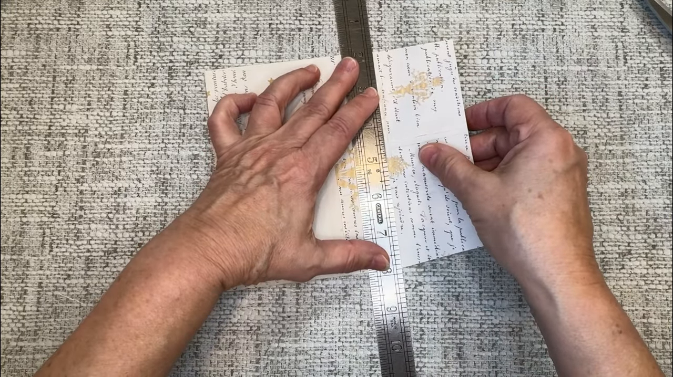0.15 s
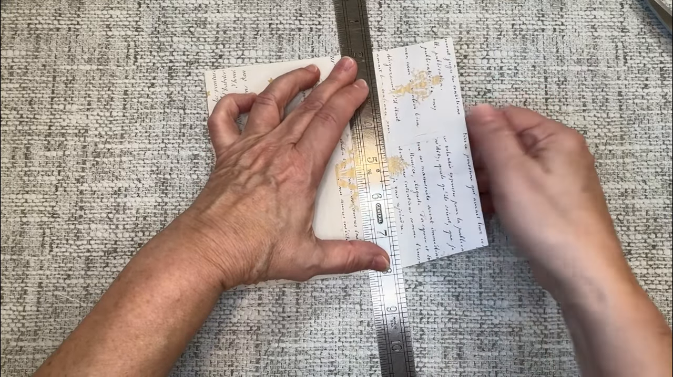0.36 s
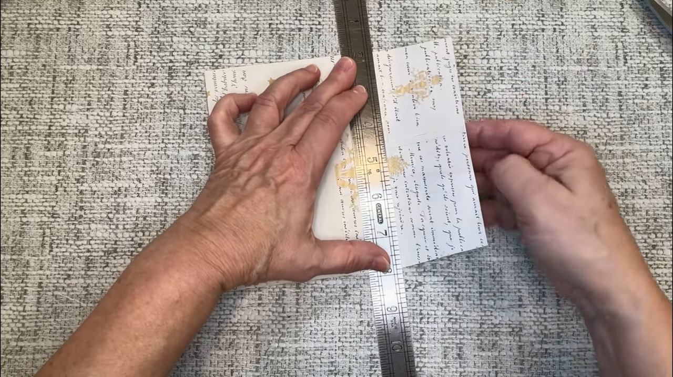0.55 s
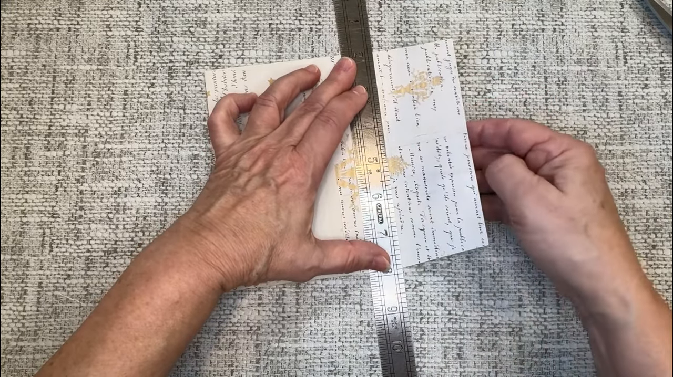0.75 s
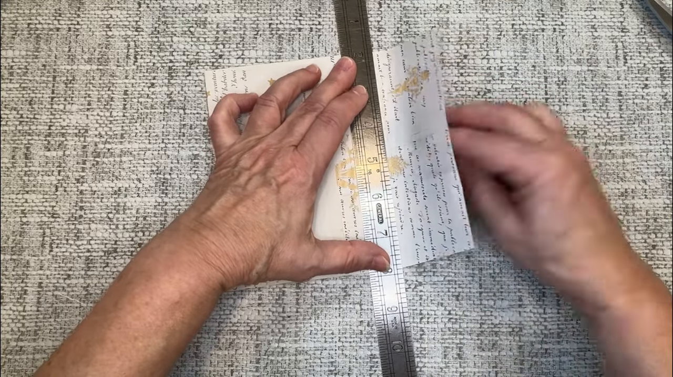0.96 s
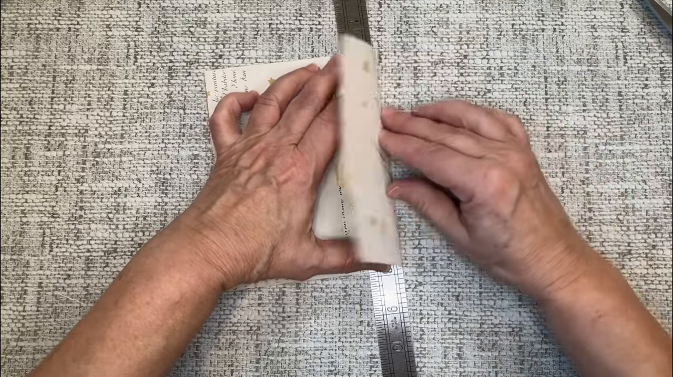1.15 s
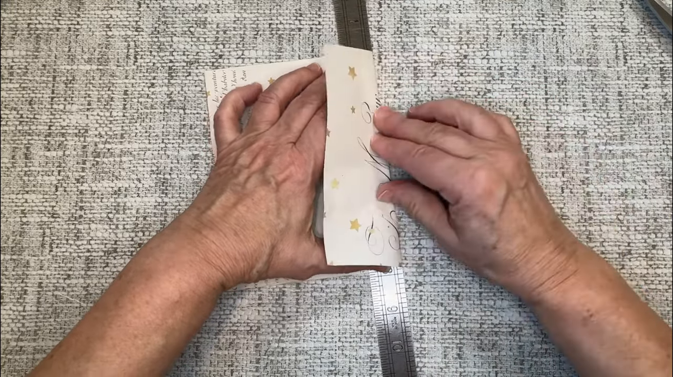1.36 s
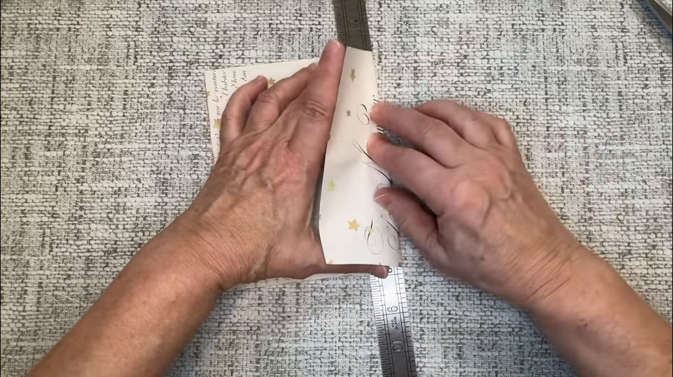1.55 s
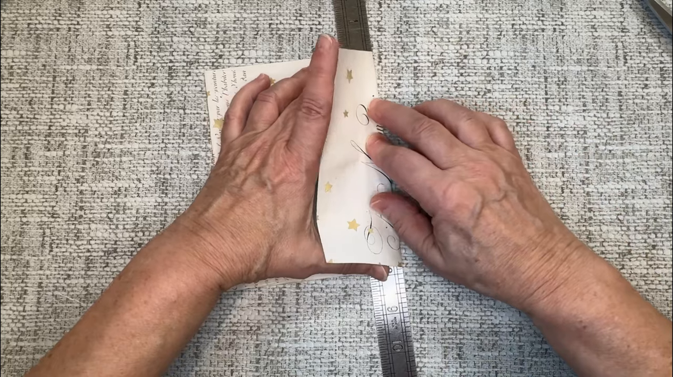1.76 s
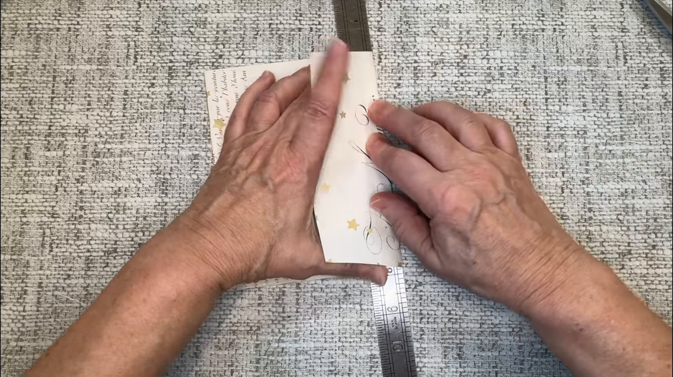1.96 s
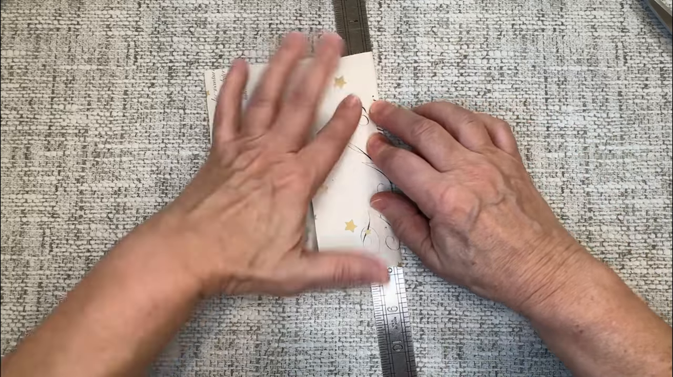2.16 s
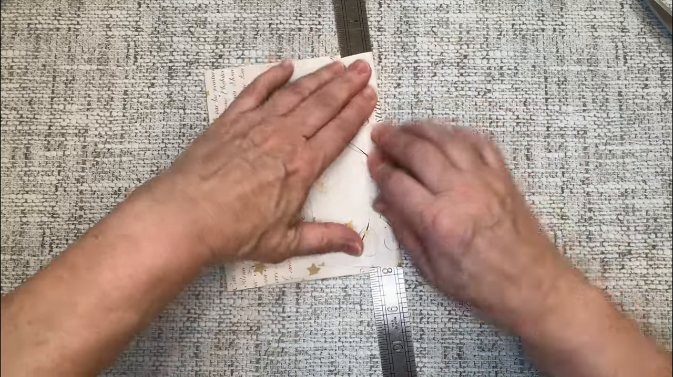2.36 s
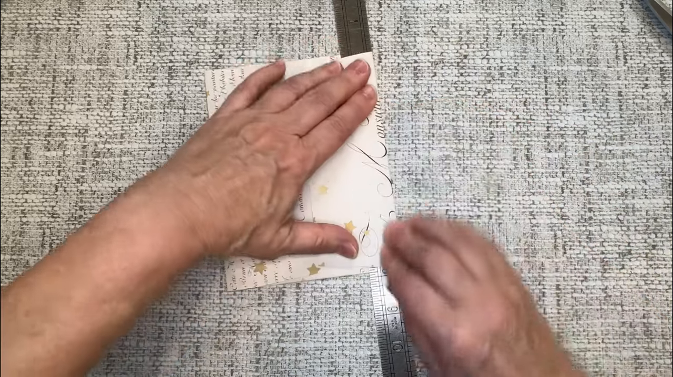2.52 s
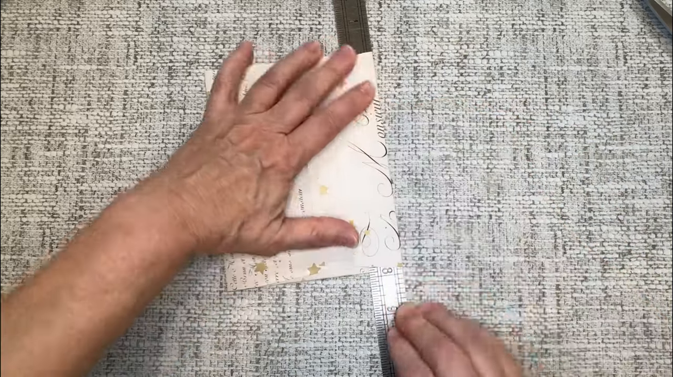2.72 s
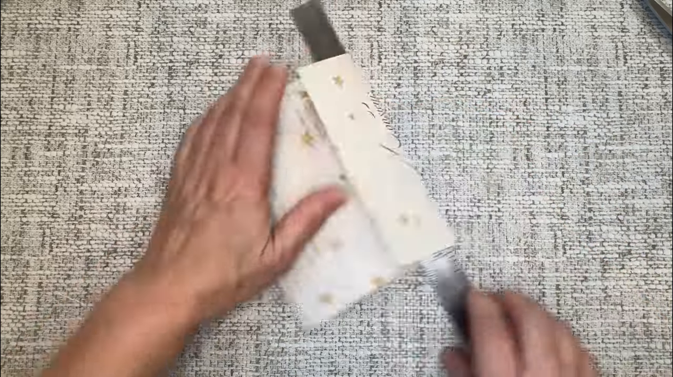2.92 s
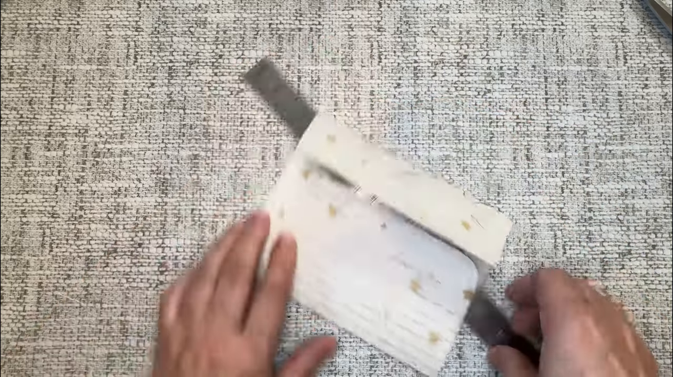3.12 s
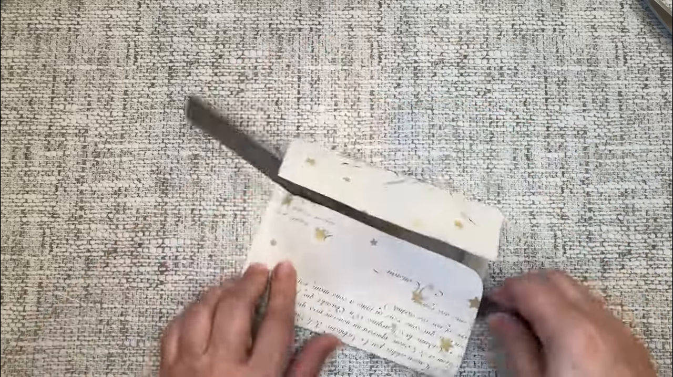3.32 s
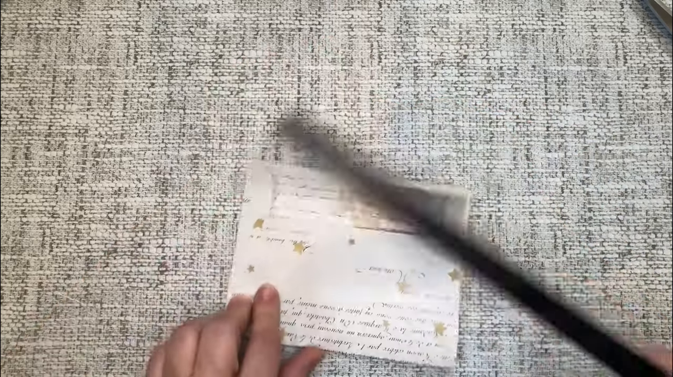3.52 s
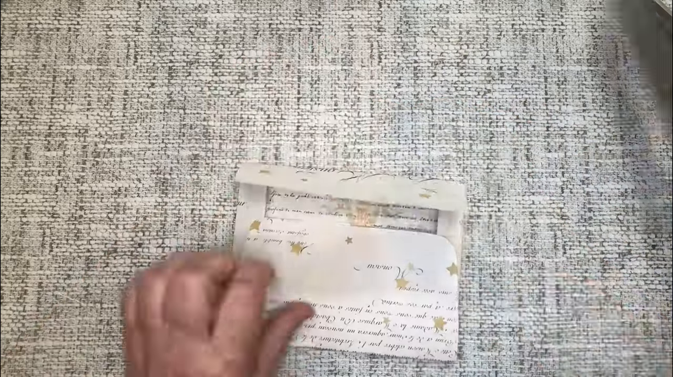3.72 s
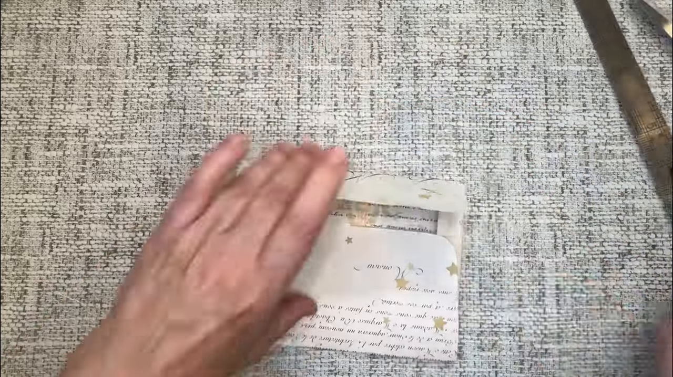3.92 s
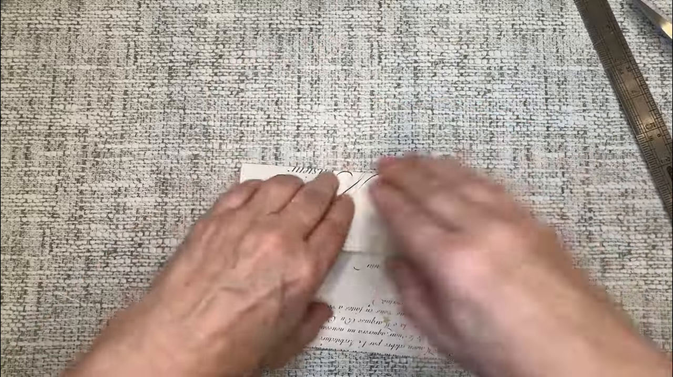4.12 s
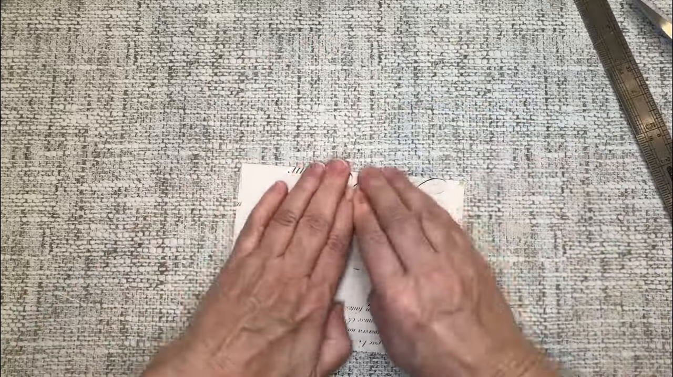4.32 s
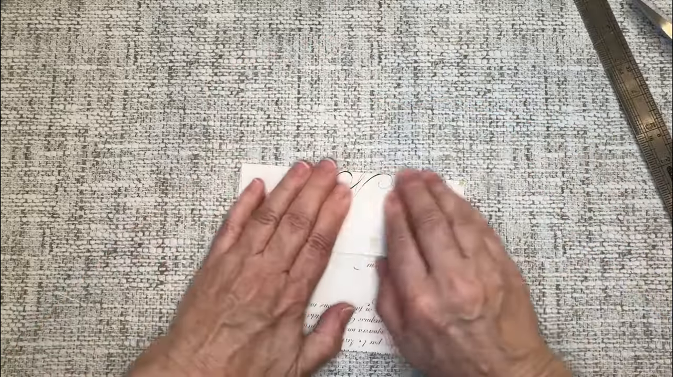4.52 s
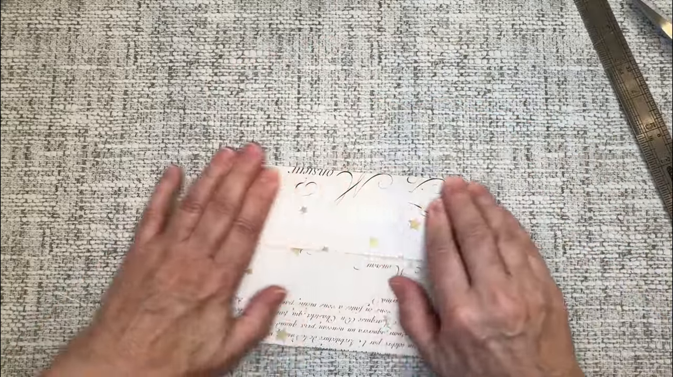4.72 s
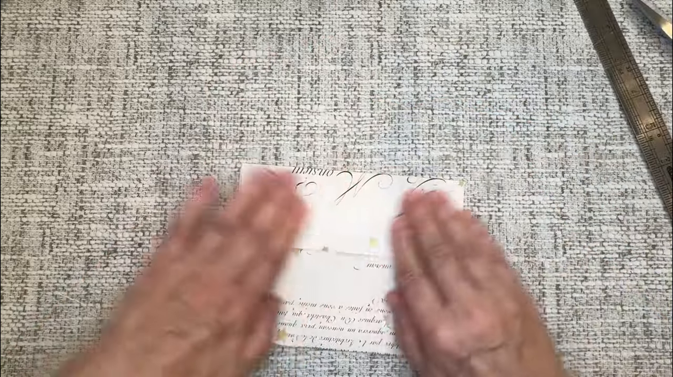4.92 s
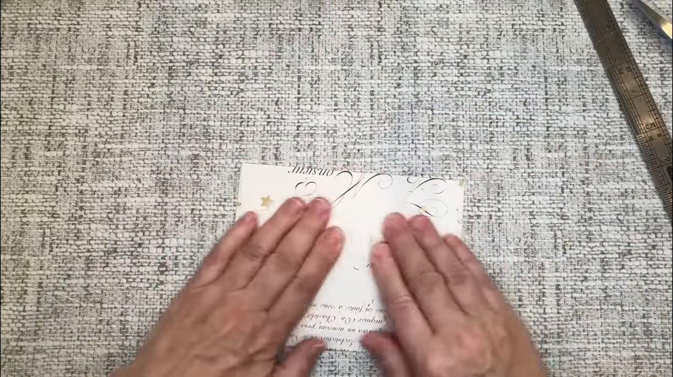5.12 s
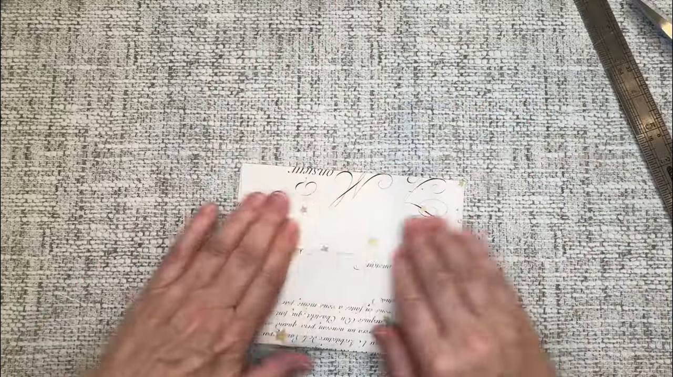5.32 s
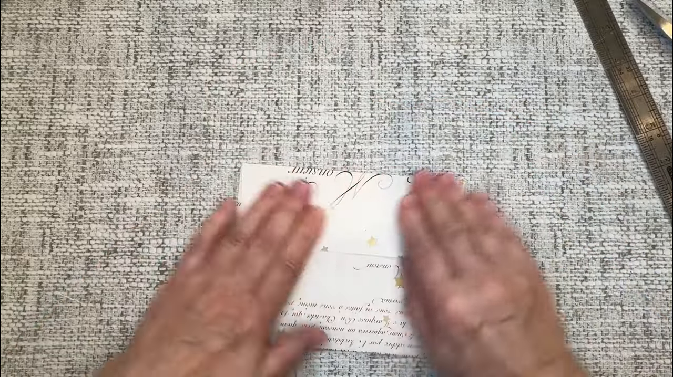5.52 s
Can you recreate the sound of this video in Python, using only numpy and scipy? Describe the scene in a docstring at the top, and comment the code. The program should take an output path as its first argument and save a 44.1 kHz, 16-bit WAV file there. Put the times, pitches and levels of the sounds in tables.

```python
"""At a table in a quiet room, hands fold a small sheet of paper over a steel ruler on a mat, lay the
ruler aside and rub the crease flat. Skin hisses over the fibres, edges scrape, and the sheet's
resonant panels rustle and snap as they buckle. The ruler clatters and rings; the table thuds under
the hands. Faint air and mains hum lie underneath, and the stereo image is that of two microphone ports."""
import sys
import numpy as np
from scipy import signal
from scipy.fft import rfft, irfft, next_fast_len
from scipy.io import wavfile
from scipy.ndimage import uniform_filter1d

SR = 44100
rng = np.random.default_rng(int(sys.argv[2]) if len(sys.argv) > 2 else 0)


def file_out(sig):
    """Save sig as 16-bit WAV at sys.argv[1]."""
    # one column per channel
    cols = np.atleast_2d(sig).T
    # limit, then scale
    lim = np.clip(cols, -1, 1)
    pcm = np.round(lim * 32767).astype(np.int16)
    wavfile.write(sys.argv[1], SR, pcm)


N = 250207
T, FFT_SIZE = np.arange(N) / SR, next_fast_len(N + SR // 2)
HZ = np.maximum(np.arange(FFT_SIZE // 2 + 1) * SR / FFT_SIZE, 1)

# Cue levels are relative, ahead of each layer's trim; decays are nominal, scaled per layer.
# Skin on paper, paper on mat: t/s, rise/s, hold/s, hiss/dB, scrape/dB, rustle/dB, tilt/(dB/octave)
STROKES = [(0.167, 0.035, 0.048, -52, -56, -52, 4.5), (0.261, 0.14, 0.041, -50, -53.5, -59, 5),
           (0.474, 0.047, 0.051, -55.5, -63, -61.5, 14), (0.599, .02, 0.069, -72, -88, -71, 6.5),
           (0.777, 0.061, 0.021, -52, -59, -59, 13.5), (0.877, 0.095, 0.024, -39.5, -44, -46, 9),
           (1.003, 0.022, 0.04, -42, -47.5, -47, -3.5), (1.11, 0.058, 0.022, -51.5, -53, -49, -0.5),
           (1.3, 0.11, 0.067, -40, -45.5, -41, -3), (1.529, 0.042, 0.053, -52, -57, -45.5, -1),
           (1.642, 0.062, 0.054, -47, -53.5, -41.5, -4.5), (1.779, 0.029, 0.0099, -49, -44.5, -50, -2),
           (1.926, 0.035, 0.12, -44, -52.5, -52, 2.5), (2.204, 0.026, 0.0094, -40, -52.5, -48, -5),
           (2.263, 0.1, 0.12, -44.5, -62, -55.5, -6), (2.488, 0.02, 0.34, -48, -61, -58.5, -4.5),
           (2.77, 0.06, 0.16, -44, -46.5, -47.5, -5), (2.992, 0.051, 0.1, -38.5, -39.5, -46, 5),
           (3.192, 0.061, 0.061, -44.5, -44.5, -43.5, -1), (3.321, 0.044, 0.13, -47, -46.5, -47, -3.5),
           (3.424, 0.036, 0.019, -50, -43.5, -43, -2), (3.581, 0.037, 0.0075, -58.5, -59.5, -63, -10),
           (3.653, 0.012, 0.025, -52, -55, -52.5, -3.5), (4.08, 0.044, 0.13, -51, -50.5, -53.5, -7.5),
           (4.282, 0.026, 0.065, -58.5, -60.5, -56, -5), (4.348, 0.21, 0.19, -44, -53.5, -62, 0.5),
           (4.846, 0.04, 0.059, -40.5, -53.5, -65, 12), (4.896, 0.06, 0.017, -36, -45, -49.5, 0),
           (4.99, 0.13, 0.097, -45.5, -53.5, -60.5, 3), (5.259, 0.12, 0.029, -41.5, -52, -61.5, 6),
           (5.404, 0.066, 0.16, -42.5, -51, -50, -6)]
# The sheet buckles or is tapped: t/s, level/dB, treble offset/dB, bass offset/dB, decay/s,
# left minus right/dB, tilt/(dB/octave)
SNAPS = [(0.191, -47.5, -7, -34, 0.0097, -14, -3), (0.774, -65.5, -38, 14, 0.023, 5, -10),
         (0.987, -36, -14, -32, 0.039, -9, -2.5), (1.042, -46.5, -11, -3, 0.12, -2, 10),
         (1.183, -55.5, -20, 5, 0.097, 3, -15.5), (1.214, -18, -4.5, -12.5, 0.013, 1.5, 7.5),
         (1.343, -26.5, -21.5, -11.5, 0.024, 3.5, -5), (1.394, -32, -5.5, -19, 0.025, -7, -6),
         (1.4454, -17.5, -10, -10.5, 0.018, -1, 2.5), (1.8167, -38, 7.5, -36, 0.088, -5, -6),
         (1.824, -26, -1, -16, 0.023, -4, -1), (1.8306, -27, -28, -42, 0.019, 0, -1.5),
         (2.0318, -42.5, 4, -41, 0.11, -0.5, 0.5), (2.076, -31.5, 0, -10.5, 0.068, 0.5, -2),
         (2.2241, -42, -1, -5, 0.056, 3.5, 1.5), (2.432, -54, -17, -5, 0.011, 11, -5),
         (2.6964, -45, -4.5, -9, 0.037, 1, -9.5), (3.0402, -34, -14, -7, 0.03, 0, 3.5),
         (3.2, -36.5, -5.5, -42, 0.022, -2, -0.5), (3.233, -48, -12, -18, 0.012, -6, -5),
         (3.492, -33, -33, -8, 0.056, -4, -1.5), (3.522, -40.5, -27, 0, 0.04, -4, -8),
         (4.183, -43, 0, 3, 0.028, 10, -12.5), (4.189, -32.5, 1.5, -12, 0.016, -1.5, 5.5),
         (4.436, -51.5, -22, -17, 0.012, -8, -7.5), (5.3312, -42, 16, -29, 0.024, 5, 1.5),
         (5.379, -34, -3, -10, 0.0099, 5, -3), (5.516, -38.5, -2, -6, 0.0084, 7.5, -6.5)]
# Panel resonances: f/Hz, width/Hz, level bent over the ruler/dB, level loose/dB
PANEL_MODES = [(548, 540, -10.5, -7), (1345, 530, 5, 2), (1744, 385, 0.5, 6), (2070, 310, -11, 6),
               (2500, 846, 7.5, 5), (3240, 880, -11, -1), (4340, 1230, -5, -3.5)]
# Tone of skin on paper: f/Hz, level/dB
SKIN_EQ = [(5000, -31.5), (7500, -3.5), (9500, -3.5), (12000, 3), (13700, -3.5), (15200, -6), (16500, 0.5)]
# Tone of a scraping edge: f/Hz, level/dB
EDGE_EQ = [(2500, -8.5), (3500, 1), (4600, 6.5), (5400, 5), (6200, 7), (7200, -4), (9000, -27.5)]
# The ruler hits the table: t/s, level/dB, tick offset/dB, thud offset/dB, decay/s
RULER_HITS = [(3.7455, -21, -3.5, -43, 0.018), (3.757, -33, -23, -35, 0.017),
              (3.798, -30.5, -8, -40, 0.017), (3.864, -22.5, -10, -50, 0.044),
              (3.87, -29.5, -10, -43, 0.049), (3.881, -24, -5, -51, 0.048), (3.8934, -14.5, 3, -32, 0.021),
              (3.899, -23.5, -8, -20.5, 0.039), (3.905, -36, 14, -31, 0.028),
              (3.912, -27.5, -20, -25, 0.031), (3.927, -38, -28, -15.5, 0.17),
              (4.007, -45.5, 2.5, -22, 0.11)]
# The ruler slides off the sheet: t/s, level/dB, decay/s
RULER_GRAZES = [(3.247, -50.5, 0.15), (3.3, -62, 0.11)]
# Modes of the steel strip: f/Hz, level/dB, t60/s
STEEL_MODES = [(1250, -4, .1), (1473, -7, .12), (1538, -5, .12), (1772, -5, .12), (1842, -7, .12),
               (5718, -3, .2), (5797, 0, .2), (5889, -1, .3), (6045, -4, .12), (6126, -7, .12),
               (6370, -3, .22), (6940, -4, .16), (7430, -7, .12)]
# A hand presses on the table: t/s, level/dB, first f/Hz, last f/Hz
PUSHES = [(1.095, -48, 201, 70), (1.343, -45, 222, 210), (1.447, -56, 208, 70), (1.703, -47.5, 440, 400),
          (2.076, -46, 463, 390), (2.248, -53, 149, 59.3), (2.699, -48, 200, 190), (2.781, -48, 140, 58.5),
          (3.449, -45, 340, 307), (3.524, -50.5, 383, 352), (3.9, -42, 347, 304)]
# Tone of the table's rumble: f/Hz, level/dB
TABLE_EQ = [(36, -9), (62, 6.5), (120, 0.5), (200, 5), (320, 1), (520, -16.5), (800, -29)]
# Level of the table's low rumble as it swells and fades: t/s, level/dB
RUMBLE_BED = [(0, -69), (.9, -67.5), (2.4, -77), (3.2, -64), (4.3, -82.5), (5.67, -91)]
# Tone of the still air: f/Hz, level/dB
AIR_EQ = [(25, -16), (60, -12), (125, 7), (300, -5), (600, -2.5), (1200, 10), (2500, -8.5), (7000, -33),
          (16000, -65)]
# Mains hum: f/Hz, rms level/dB
HUM = [(60, -90), (120, -85)]
# Phase lead of the left port: f/Hz, lead/rad
PORT_LEAD = [(0, 0.5), (1200, 1.2), (2800, 2.3), (4500, 3), (5800, 5.4), (6800, 6.8), (7600, 9.4),
             (10000, 9.3), (12400, 8.3), (14500, 6.8), (16700, 6.4)]
# Likeness of the two ports: f/Hz, coherence/(0-1)
PORT_COHERENCE = [(60, 0.9), (300, 0.51), (1000, 0.07), (3000, 0.24), (6500, 0.07), (8600, 1), (11000, 0.7),
                  (13800, 0.63), (15500, 0.3)]
# Balance of the ports: f/Hz, left minus right/dB
PORT_BALANCE = [(60, 3), (300, 2), (700, 3.5), (1500, 1), (5000, 0.5), (15000, 0.5)]

HISS_T60_S, SCRAPE_T60_S, RUSTLE_T60_S = 0.21, 0.36, 0.4  # release after a stroke
SETTLE_RISE_S, SETTLE_T60_S = 0.0091, 0.53  # the sheet strains, gives, then rustles on
SETTLE_PANEL_DB, SETTLE_EDGE_DB = -29.5, -28.5
REST_DB, LEAN_DB = -85, -21  # the held sheet never lies still; the hands' weight feeds the rumble
BENT_S, FREED_S = 1.076, 2  # the flap stands bent over the ruler between these times
TILT_PIVOT_HZ, SNAP_RISE_S, HIT_RISE_S = 1800, 0.00095, 0.0003
PUSH_RISE_S, PUSH_T60_S, PUSH_SAG_S = 0.0026, 0.1, 0.012
ROOM_DB, ROOM_T60_S, ROOM_TOP_HZ = -4.5, 0.31, 3150
AIR_DB, TOP_HZ = -72, 15800


def rubbing():
    """Skin hisses over the paper, edges scrape, panels rustle, the hands' weight rumbles in the table."""
    times, db = np.transpose([row[:2] for row in SNAPS + RULER_HITS])
    settle = bursts(times, db, np.full(len(times), SETTLE_T60_S), SETTLE_RISE_S)
    starts, _, _, hiss_db, scrape_db, rustle_db, tilts = np.transpose(STROKES)
    hiss_env = strokes(hiss_db, HISS_T60_S)
    scrape_env = np.hypot(strokes(scrape_db, SCRAPE_T60_S), settle * undb(SETTLE_EDGE_DB))
    slide_env = strokes(rustle_db, RUSTLE_T60_S) + undb(REST_DB)
    rustle_env = np.hypot(slide_env, settle * undb(SETTLE_PANEL_DB))
    rumble_env = slide_env * undb(LEAN_DB) + undb(np.interp(T, *np.transpose(RUMBLE_BED)))
    tilt = uniform_filter1d(latest(starts, tilts), size=SR // 50)
    fibres = stereo_noise() * grit(1.8, 1.4, rate_hz=60)
    hiss = hiss_env * voiced(fibres, SKIN_EQ)
    scrape = scrape_env * voiced(fibres, EDGE_EQ)
    crinkle = grit(2.45, 1.35, rate_hz=60)
    rustle = rustle_env * unit(panels(crinkle, tilt, wander_db=3.07, rate_hz=11))
    rumble = rumble_env * voiced(stereo_noise() * grit(2.37, 2.1, rate_hz=21.97), TABLE_EQ)
    return undb(-2) * hiss + undb(-6.5) * scrape + undb(-3) * (rustle + rumble)


def strokes(levels_db, t60):
    """Envelope of the hand strokes: swell, hold, release; the strongest stroke leads."""
    out = np.zeros(N)
    for (start, rise, hold, *_), db in zip(STROKES, levels_db):
        near = slice(int(start * SR), int((start + rise + hold + t60) * SR))
        t = np.maximum(T[near] - start, 0)
        swell = np.clip(t / rise, 0, 1) ** 1.3
        release_db = -60 * np.maximum(t - rise - hold, 0) / t60
        out[near] = np.maximum(out[near], undb(db + release_db) * swell)
    return out


def grit(scatter_db, flicker_db, rate_hz):
    """Grain of slipping fibres: tiny impulses of uneven size, in uneven patches."""
    return undb(scatter_db * np.minimum(rng.exponential(size=N), 7) + flicker_db * drift(rate_hz))


def panels(drive, tilt, wander_db, rate_hz):
    """Noise shakes each panel, which swells or fades as the paper bends; tilt favours small or large."""
    bent = uniform_filter1d(1. * ((T > BENT_S) & (T < FREED_S)), size=SR // 20)
    spectrum = 0
    for hz, width, bent_db, loose_db in PANEL_MODES:
        db = bent * bent_db + (1 - bent) * loose_db
        db += wander_db * drift(rate_hz) + tilt * np.log2(hz / TILT_PIVOT_HZ)
        spectrum += rfft(drive * stereo_noise() * undb(db), FFT_SIZE) * steep_peaks([(hz, width, 0)])
    return irfft(spectrum, FFT_SIZE)[:, :N]


def snaps():
    """Each buckle shakes the panels, sprays a short tick and thumps the table; gives sound and pan."""
    times, db, treble_db, bass_db, t60, pan_db, tilts = np.transpose(SNAPS)
    tick = stereo_noise() * bursts(times, db + treble_db, 0.63 * t60, SNAP_RISE_S)
    thud = stereo_noise() * bursts(times, db + bass_db - 4, 2.18 * t60, SNAP_RISE_S)
    buckle = bursts(times, db + 4, t60, SNAP_RISE_S)
    body = panels(buckle, latest(times - .003, tilts), wander_db=1, rate_hz=6.34)
    tick = coloured(tick, steep_peaks([(5135, 540, 3.2), (7900, 8700, 2)]))
    thud = coloured(thud, steep_peaks([(490, 510, -10), (765, 710, -10)]))
    side_db = latest(times - .02, pan_db) / 2
    return body + tick + thud, undb([side_db, -side_db])


def ruler():
    """Rattling contacts ring the steel strip, with a bright tick on top and a table thud below."""
    times, db, tick_db, thud_db, t60 = np.transpose(RULER_HITS)
    steel = sum(resonance(hz, np.log(1000) / (np.pi * ring_s), mode_db + 20 * np.log10(ring_s))
                for hz, mode_db, ring_s in STEEL_MODES)
    rattle_eq = steep_peaks([(1680, 1260, 14.5), (2250, 2100, 14.5), (3980, 2500, -24),
                             (6150, 1200, 17.5), (7200, 4800, 16.5)])
    thud_eq = steep_peaks([(197, 51, 0.79), (325, 780, 0.18)])
    tick_eq = undb(curve(SKIN_EQ))
    ring = coloured(stereo_noise() * bursts(times, db, 0.25 * t60, HIT_RISE_S), steel)
    rattle = coloured(stereo_noise() * bursts(times, db, t60, HIT_RISE_S), rattle_eq)
    tick = coloured(stereo_noise() * bursts(times, db + tick_db, 0.77 * t60, HIT_RISE_S), tick_eq)
    thud = coloured(stereo_noise() * bursts(times, db + thud_db, 3 * t60, 10 * HIT_RISE_S), thud_eq)
    return undb(2) * ring + undb(-1) * rattle + tick + thud + grazes(steel)


def grazes(steel):
    """A light sliding contact stirs only a few high modes: the ruler sings thinly."""
    times, db, t60 = np.transpose(RULER_GRAZES)
    friction = stereo_noise() * bursts(times, db, t60, rise_s=.004)
    return coloured(friction, steel * steep_peaks([(5800, 640, 0)]))


def pushes():
    """Each push is a soft knock of the table top whose pitch sags as the bend spreads."""
    out = np.zeros(N)
    for start, db, first_hz, last_hz in PUSHES:
        near = slice(int(start * SR), int(start * SR) + SR // 4)
        t = T[near] - start
        hz = last_hz + (first_hz - last_hz) * np.exp(-t / PUSH_SAG_S)
        envelope = undb(db - 60 * t / PUSH_T60_S) * (1 - np.exp(-t / PUSH_RISE_S))
        out[near] += envelope * np.sin(2 * np.pi * np.cumsum(hz) / SR)
    return out


def room_tail(send):
    """Short, dull, diffuse reverb with 6 ms of pre-delay, different on each side."""
    t = T[:SR // 2]
    tail = rng.standard_normal((2, len(t))) * np.exp(-np.log(1000) * t / ROOM_T60_S) * (t > .006)
    response = rfft(tail / np.sqrt(np.sum(tail ** 2) / 2), FFT_SIZE)
    return filtered(send, undb(ROOM_DB) * response / (1 + 1j * HZ / ROOM_TOP_HZ))


def room_air():
    """Still air: a faint bed of dark noise."""
    return undb(AIR_DB) * voiced(stereo_noise(), AIR_EQ)


def mains_hum():
    """The mains tone and its octave, barely there."""
    return sum(undb(db) * np.sqrt(2) * np.sin(2 * np.pi * (hz * T + rng.random())) for hz, db in HUM)


def ports(pair):
    """Two microphone ports: mid reaches both, side makes them differ; left leads and is a bit louder."""
    coherence = np.clip(curve(PORT_COHERENCE), 0, .99)
    mid, side = rfft(pair, FFT_SIZE) * np.sqrt([(1 + coherence) / 2, (1 - coherence) / 2])
    lead = np.interp(HZ, *np.transpose(PORT_LEAD))
    skew = np.exp(.5j * lead) * undb(curve(PORT_BALANCE) / 2)
    return irfft(np.array([(mid + side) * skew, (mid - side) / skew]), FFT_SIZE)[:, :N]


def bursts(times, levels_db, t60s, rise_s):
    """Envelope of hits that swell exponentially, peak 1 ms after their cue and die away."""
    out = np.zeros(N)
    for start, gain, t60 in zip(times, undb(levels_db), t60s):
        near = slice(max(int((start - .05) * SR), 0), int((start + 0.5) * SR))
        t = T[near] - start - .001
        out[near] += gain * np.exp(np.minimum(t / rise_s, -np.log(1000) * t / t60))
    return out


def drift(rate_hz):
    """Smooth random modulation of rms 1."""
    step = int(SR / rate_hz)
    stairs = np.repeat(rng.standard_normal(N // step + 1), step)
    return unit(uniform_filter1d(uniform_filter1d(stairs, step), step)[:N])


def latest(times, values):
    """Hold each cue's value until the next."""
    return values[np.maximum(np.searchsorted(times, T) - 1, 0)]


def resonance(hz, width, db):
    """Response of one resonant band."""
    return undb(db) / (1 + 1j * (HZ - hz * hz / HZ) / width)


def steep_peaks(peaks):
    """Bands (f/Hz, width/Hz, level/dB per pass) passed twice: dark valleys between them."""
    return sum(resonance(*peak) ** 2 for peak in peaks)


def curve(table):
    """Read a table at every frequency, on a log axis."""
    hz, value = np.transpose(table)
    return np.interp(np.log(HZ), np.log(hz), value)


def filtered(x, gain):
    """Apply a gain for each frequency."""
    return irfft(rfft(x, FFT_SIZE) * gain, FFT_SIZE)[..., :N]


def coloured(x, gain):
    """Filter without changing the power of white noise."""
    return filtered(x, gain / np.sqrt(np.mean(np.abs(gain) ** 2)))


def voiced(x, eq):
    """Apply an EQ table and level to rms 1."""
    return unit(filtered(x, undb(curve(eq))))


def stereo_noise():
    """Two independent strands of white noise."""
    return rng.standard_normal((2, N))


def unit(x):
    """Scale to rms 1."""
    return x / np.sqrt(np.mean(x ** 2))


def undb(db):
    """Decibels to gain."""
    return 10 ** (np.asarray(db) / 20)


def scene():
    """Mix paper, ruler and table over the room tone; only snaps and ruler feed the reverb."""
    snap, snap_pan = snaps()
    clatter = ruler()
    air, hum = room_air(), mains_hum()
    direct = ports(rubbing() + clatter + air) + ports(snap) * snap_pan + pushes()
    return direct + room_tail(snap[0] + clatter[0]) + hum


def record(dry):
    """A steep low-pass shaves off the very top."""
    return signal.sosfilt(signal.ellip(10, .2, 70, TOP_HZ, fs=SR, output="sos"), dry)


dry = scene()
out = record(dry)
file_out(out)
```